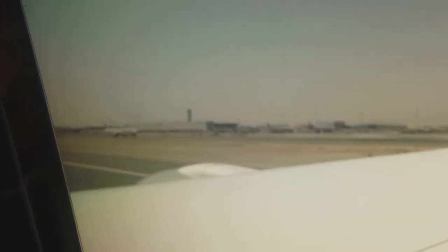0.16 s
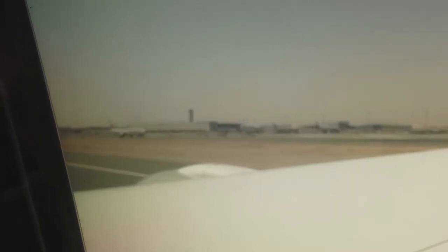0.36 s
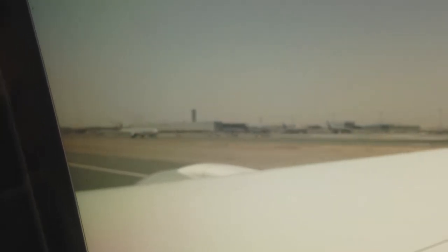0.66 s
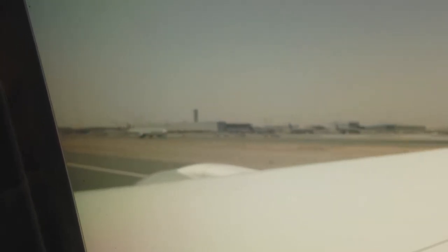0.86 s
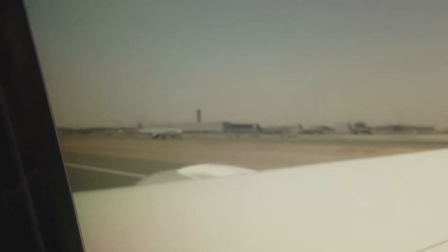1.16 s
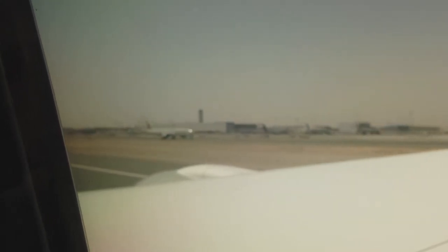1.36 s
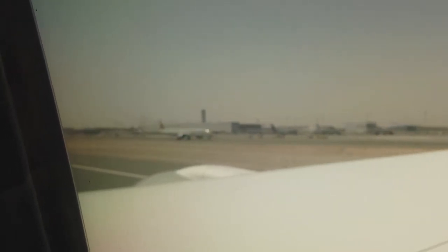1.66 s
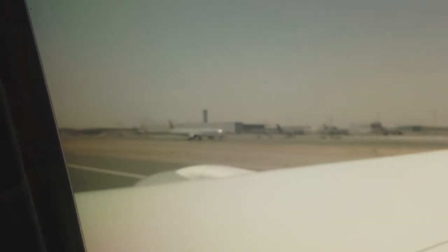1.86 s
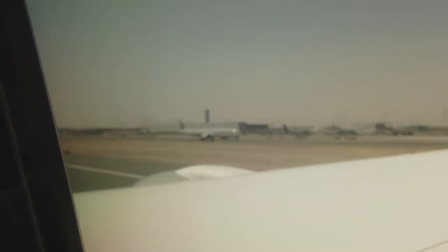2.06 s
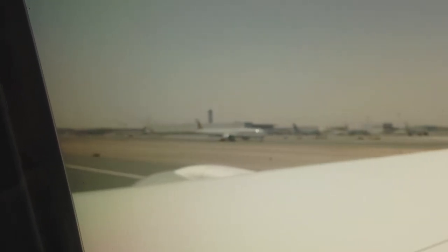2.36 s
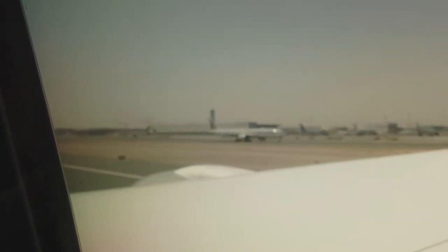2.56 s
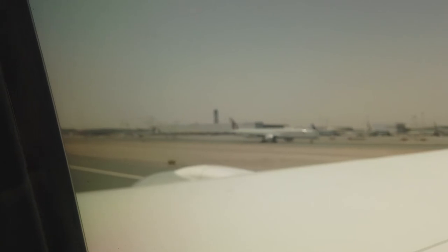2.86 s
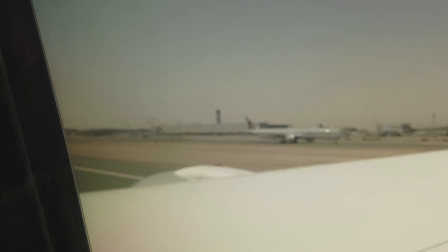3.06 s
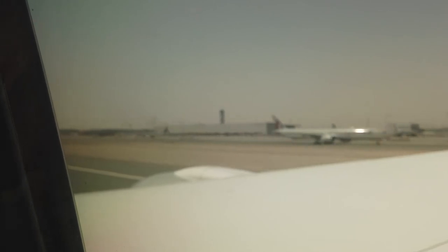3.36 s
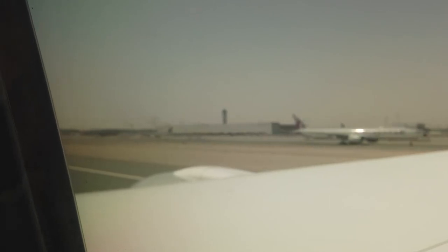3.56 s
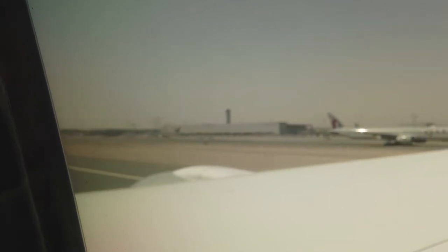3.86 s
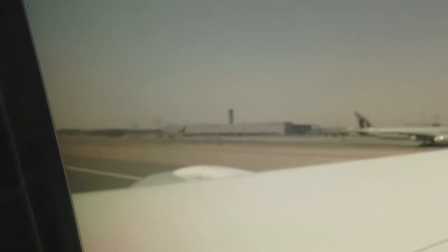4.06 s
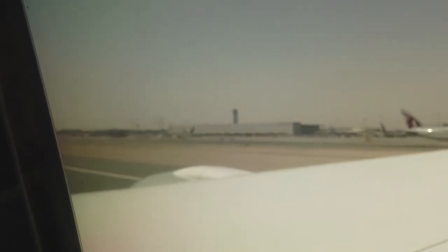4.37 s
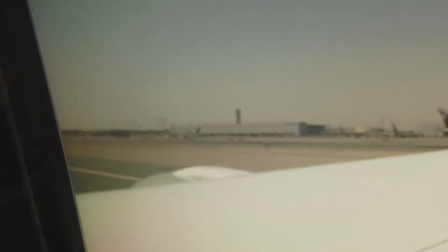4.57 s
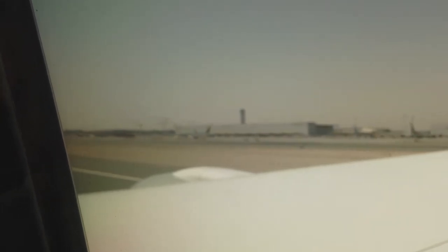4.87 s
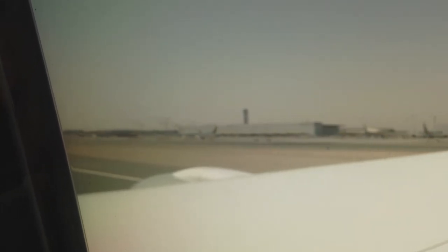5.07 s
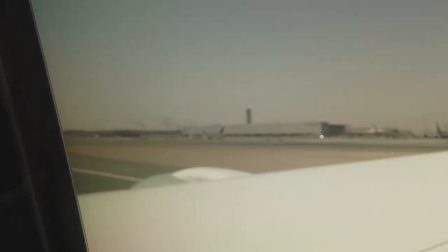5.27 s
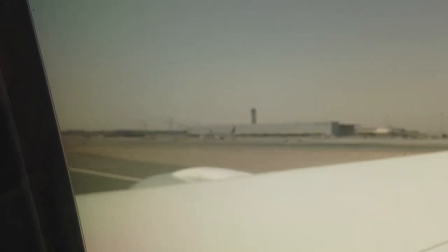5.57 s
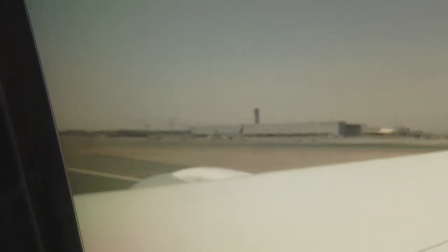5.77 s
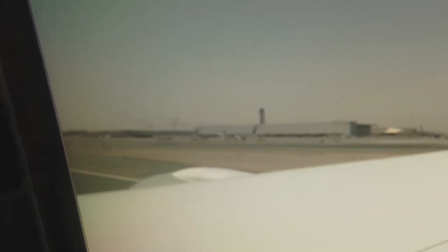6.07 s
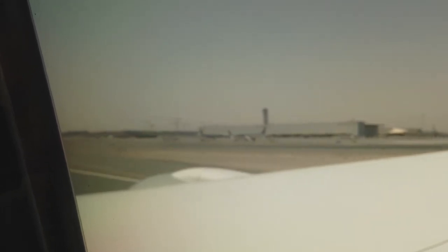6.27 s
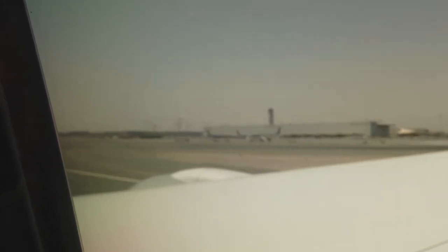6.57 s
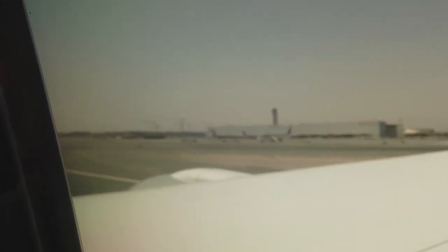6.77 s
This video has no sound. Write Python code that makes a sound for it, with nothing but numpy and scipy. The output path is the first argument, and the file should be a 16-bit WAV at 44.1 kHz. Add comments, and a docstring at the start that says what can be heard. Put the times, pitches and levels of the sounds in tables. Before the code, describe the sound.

Continuous interior of a passenger jet rolling on the ground: heavy low-frequency rumble and airframe roar dominate, with irregular muffled jolts. A quiet air rush and wavering fan tones sit behind. Small plastic rattles arrive in clusters near two, three and five seconds, with tiny metallic jingles and clicks. Close microphone at the seat, wide soft treble, short absorbent cabin tail.

```python
"""Airliner cabin while taxiing

Inside an airliner at a steady taxiing speed, heard from a window seat over the wing.
Pavement shakes the fuselage into a heavy rumble of band-limited noise and ringing jolts.
Drifting sines give the engine drone, the fans and beating whines; filtered noise gives air and hiss.
Impulses and short rings make the plastic trim chatter, with knocks, ticks, jingles and squeaks."""
import sys
import numpy as np
from scipy import signal
from scipy.fft import rfft, irfft, next_fast_len
from scipy.io import wavfile
from scipy.ndimage import uniform_filter1d

SR = 44100
rng = np.random.default_rng(int(sys.argv[2]) if len(sys.argv) > 2 else 0)


def wav_record(signal):
    """Record a signal, one row per channel, as 16-bit PCM in the file named by sys.argv[1]."""
    frames = np.transpose(np.atleast_2d(signal))
    bounded = np.clip(frames, -1, 1)
    # unit amplitude maps onto the largest positive 16-bit level
    quanta = np.round(bounded * 32767).astype(np.int16)
    wavfile.write(sys.argv[1], SR, quanta)


N = 304731
TIME = np.arange(N) / SR  # s

# Spectral shapes of the sources. Each row: frequency in Hz, relative response in dB.
AIR_SPECTRUM = [(200, 9.5), (600, 1), (800, 2.5), (1200, -0.5), (1500, -4), (1900, -5), (2600, -10),
                (3200, -24), (3900, -24.5), (5400, -29.5), (6500, -35.5), (9000, -39)]
HISS_SPECTRUM = [(7000, -35), (8900, -15), (9600, -2), (10400, 0), (11000, -4), (11800, -14), (14000, -28)]
PANEL_SPECTRUM = [(200, -17), (500, -8), (1000, 3), (1350, 2), (1550, 0), (1800, -1), (2200, -4),
                  (3000, -8), (4200, -24), (7000, -36)]
METAL_SPECTRUM = [(1500, -22.5), (3000, 5), (4200, -4.5), (5000, 3), (6000, -8.5), (6700, -1.5),
                  (8500, -15), (9700, 0.5), (10600, 3.5), (12000, -7), (15000, -8)]
TRIM_SPECTRUM = [(400, -20), (900, -5), (1250, -2), (1550, -4), (1850, 0), (2350, 1.5), (2600, 1.5),
                 (2750, 0), (2950, 2), (3250, -6.5), (3600, -14), (4100, -19.5), (4600, -20), (5030, -17.5),
                 (5400, -22), (5800, -21), (6300, -31), (6700, -28), (7300, -38), (13000, -43)]
ROAR_SPECTRUM = [(70, -12), (120, 4.5), (160, 5), (180, -1), (195, 1), (210, -2.5), (260, -6.5),
                 (312, -5.5), (330, -10.5), (355, -8), (398, -14.5), (420, -10), (478, -20), (520, -17.5),
                 (650, -27), (1000, -43), (2000, -72)]
HULL_SPECTRUM = [(12, -26.5), (22, -16), (34, -14), (43, -12), (53, 3), (60, -2.5), (69, 0), (78, -8),
                 (100, -27)]
FLOOR_SPECTRUM = [(55, -28.5), (72, -4.5), (82, 6.5), (105, 2), (130, -8.5), (170, -27), (260, -60)]
# The airframe's steady, deepest rumble. Each row: frequency in Hz, relative response in dB.
DEEP_SPECTRUM = [(14, -17), (24, -4.5), (34, 0), (44, -5.5), (60, -19.5)]
# Stereo width of diffuse cabin sound. Each row: frequency in Hz, side minus mid level in dB.
WIDTH = [(60, -48), (110, -40), (160, -41), (320, -29), (740, -20), (1200, -17), (1700, -13), (2100, -7),
         (2700, 1), (4000, 1), (7000, 0), (8200, 3), (10500, -3), (12000, 1), (14000, 0)]

# Ventilation fan tone through time. Each row: time in seconds, mean level in dB rms.
FAN_LEVEL = [(0, -57), (0.55, -55), (1.2, -59.5), (3.05, -56.5), (3.6, -52), (4.15, -50), (4.45, -62),
             (4.68, -56), (5, -50.5), (6.05, -52.5), (6.5, -59.5), (6.91, -55.5)]
# Hum of the stronger pump through time. Each row: time in seconds, peak level in dB.
PUMP_LEVEL = [(0, -56.5), (2.1, -55.5), (3, -57), (4.4, -58.5), (5.1, -56), (6.05, -58.5), (6.4, -52),
              (6.91, -58.5)]
# Stronger electrical whine through time. Each row: time in seconds, level in dB rms.
ELECTRIC_LEVEL = [(0, -64), (0.9, -72.5), (2.6, -68.5), (3.3, -78), (3.95, -71), (6.1, -78.5), (6.91, -79)]
# Steady machine tones. Each row: mean frequency in Hz, mean level in dB rms, rms wander in Hz,
# phase between the ears in radians.
MACHINE_TONES = [(68.5, -31, 1.2, 0), (1368, -69, 1, .2), (1709, -68.5, 1, .3), (3663, -87, 6, 1),
                 (9376, -94, 3, 1.8), (9589, -90, 3, 1.5), (12328, -79, 3, 1), (13670, -87, 3, 2.4)]

# Wall panel knocks. Each row: start in seconds, level in dB before the knock gain and panel filter.
KNOCKS = [(0.49, -31), (2.427, -31), (4.842, -34), (5.825, -36)]
# Wall panel shudders. Each row: start in seconds, level in dB before gain and filter, decay in seconds.
SHUDDERS = [(0.493, -52, 0.023), (0.927, -52, 0.058), (2.435, -52.5, 0.11), (2.924, -51, 0.056),
            (4.891, -50, 0.035), (5.379, -51, 0.052), (5.825, -48.5, 0.013), (6.786, -50, 0.074)]
# Clicks of tiny metal parts. Each row: start in seconds, envelope peak in dB before filtering.
CLICKS = [(0.585, -60), (1.089, -62), (4.61, -62), (4.889, -58), (5.366, -52), (5.424, -54), (5.482, -57),
          (5.696, -52), (5.753, -59.5), (5.806, -59.5), (5.925, -57.5), (6.035, -55.5), (6.673, -57)]
# Jingles of small metal fittings. Each row: start in seconds, level in dB before rise, gain and filter,
# decay in seconds.
JINGLES = [(1.932, -55.5, 0.025), (1.968, -62, 0.028), (2.432, -51, 0.011), (2.442, -46, 0.0095),
           (2.498, -56, 0.025), (2.055, -62.5, 0.018), (2.957, -62, 0.016), (4.665, -58, .02),
           (5.367, -84, 0.033), (5.809, -58.5, 0.019), (6.781, -50.5, 0.0084), (6.807, -58, .02)]
# Squeaks of a fitting. Each row: peak time in seconds, mean pitch in Hz, peak level of each partial in dB.
SQUEAKS = [(0.395, 5770, -62.5), (1.16, 5700, -64.5), (2.22, 5730, -63), (3.325, 5770, -65),
           (6.69, 5800, -68)]
# Ticks of small catches. Each row: start in seconds, envelope peak in dB, mean ring frequency in Hz.
TICKS = [(1.566, -60, 5030), (1.675, -50.5, 4160), (1.68, -61, 4650), (1.974, -53, 5030),
         (2.047, -62, 6350), (3.687, -66, 5500), (3.718, -56, 5270), (3.774, -65, 5370),
         (4.041, -55.5, 5140), (4.064, -56, 5040), (4.19, -59, 4800), (5.085, -56, 4960),
         (5.255, -56, 5000)]
# Rubs of loose trim. Each row: start in seconds, level in dB before rise, gain and filter, decay in seconds.
RUBS = [(0.91, -54.5, .06), (1.935, -51.5, 0.087), (2.055, -62, 0.086), (2.285, -60.5, .05),
        (2.425, -56, 0.12), (2.88, -58, 0.085), (2.96, -61.5, .08), (3.21, -63, .04), (3.03, -61, .03),
        (3.65, -57, .12), (4.67, -59.5, 0.059), (4.875, -63.5, 0.072), (4.955, -62, 0.026),
        (5.38, -61.5, 0.093), (6.795, -57, 0.033)]
# Taps of loose trim. Each row: start in seconds, level in dB before the tap or piece gain.
CHATTER = [(0.113, -45), (0.492, -45), (0.841, -45), (0.916, -43), (0.951, -43), (0.96, -44), (1.39, -47),
           (1.858, -43), (1.891, -42), (1.943, -37), (1.957, -43), (1.969, -37), (2.0, -42), (2.058, -39),
           (2.076, -43), (2.153, -46), (2.281, -44), (2.31, -42), (2.403, -42), (2.418, -45), (2.434, -37),
           (2.448, -42), (2.468, -41), (2.497, -44), (2.511, -41), (2.552, -45), (2.59, -45), (2.882, -45),
           (2.896, -46), (2.926, -39), (2.974, -39), (2.991, -41), (3.033, -43), (3.05, -38), (3.216, -41),
           (3.233, -41), (3.336, -46), (3.458, -44), (3.476, -45), (3.593, -45), (3.65, -46), (3.774, -38),
           (3.832, -45), (4.03, -44), (4.683, -39), (4.886, -41), (4.962, -43), (4.979, -43), (5.05, -39),
           (5.192, -45), (5.252, -37), (5.367, -42), (5.385, -36), (5.401, -42), (5.445, -41), (5.827, -35),
           (5.845, -43), (5.958, -45), (6.071, -42), (6.339, -47), (6.566, -42), (6.595, -46), (6.695, -44),
           (6.801, -37), (6.813, -43), (6.821, -43)]

# Jolts from pavement joints. Each row: start in seconds, envelope peak in dB, airframe ring in Hz.
JOINTS = [(0.278, -14.5, 83), (0.563, -13, 67.5), (1.031, -14, 30.2), (1.066, -13.5, 90.4),
          (1.278, -14, 92.4), (1.343, -15.5, 66.3), (1.467, -16.5, 78), (1.868, -17, 30), (1.895, -14, 61),
          (2.381, -13, 75.2), (2.472, -7.5, 68.6), (2.49, -19, 33), (2.689, -10, 74), (2.76, -9.5, 76.3),
          (2.857, -8.5, 68), (3.008, -6.5, 68), (3.208, -12.5, 78), (3.628, -10.5, 70.3),
          (3.801, -11, 56.5), (4.659, -9.5, 69), (4.69, -18, 31.7), (4.78, -15.5, 90.7), (5.054, -10.5, 75),
          (5.212, -9, 70), (5.331, -7, 64.8), (5.676, -23.5, 73.3), (5.796, -8, 63.4), (5.903, -14.5, 72.7),
          (6.017, -12, 68), (6.076, -33, 307), (6.177, -24.5, 237), (6.294, -18, 79.2), (6.371, -14.5, 82),
          (6.415, -32.5, 376), (6.54, -20, 83), (6.77, -11.5, 69.4)]
# Rough pavement under the wheels. Each row: start in seconds, length in seconds,
# deep hull rumble in dB, floor drumming in dB.
PATCHES = [(0.0, 0.27, -29.5, -26.5), (0.525, .13, -22.5, -29), (0.833, 0.08, -21.5, -33.5),
           (1.06, 0.12, -21.5, -19), (1.323, 0.29, -25, -21), (1.793, 0.33, -20.5, -25.5),
           (2.364, 0.22, -16, -22.5), (2.684, 0.1, -19, -24.5), (2.852, 0.28, -17, -24.5),
           (3.399, .1, -20.5, -27.5), (3.615, 0.13, -18, -27.5), (4.412, .1, -19.5, -28),
           (4.643, 0.16, -18.5, -23.5), (4.886, 0.12, -21.5, -39), (5.015, 0.15, -20, -25.5),
           (5.219, 0.22, -18, -33), (5.637, 0.41, -20.5, -21.5), (6.13, 0.23, -22, -25.5),
           (6.532, 0.053, -17, -15), (6.762, 0.053, -21.5, -23)]

FAN_HZ, PUMP_HZ, ELECTRIC_HZ = 633, 853.8, 10957
PUMP_BEAT_HZ, PUMP_CREST_S = 1.6, 0.115
PUMP_SLIP_RAD = 0.36  # the second pump runs a little unevenly
PUMP_APART_RAD = 0.3  # phase between the ears
TONE_WAVER_DB = 1.5  # the machine tones swell and sink

RUSH_DB, RUSH_FOLLOW = -48, 0.08  # rush of air and tyres; dB per dB of shaking
BUZZ_DB, BUZZ_FOLLOW = -64, 0.27  # fine buzz of the trim; dB per dB of shaking
ROAR_DB, ROAR_FOLLOW = -33.5, 0.35  # airframe roar; dB per dB of floor drumming
DEEP_DB = -32.5

KNOCK_DB, KNOCK_RING_S = 10.5, 0.005
JINGLE_RISE_S = 0.012
SQUEAK_WAVER, SQUEAK_RISE_S, SQUEAK_FADE_S = 0.008, 0.007, 0.015  # waver: rms share of the pitch
TICK_DECAY_S, TICK_WAVER = 0.0037, 0.089  # waver: rms share of the ring pitch
TAP_DB, TAP_RING_S = 9, 0.003
RUB_DB, RUB_RISE_S = 1.5, 0.014
STRAY_DB, STRAY_RANGE_DB = -51, 5  # strongest stray tap at mean shaking; spread below it
BOUNCE_MIN_S, BOUNCE_SPREAD_S, BOUNCE_DROP_DB, BOUNCE_FADE_DB = 0.002, 0.011, 11, 3
PIECE_LOW_HZ, PIECE_HIGH_HZ = 2000, 3000
PIECE_DB, PIECE_RISE_S, PIECE_RING_S = -1, 0.0003, 0.0016
RING_SIDE_DB, CONTACT_SPREAD = -5, 0.6  # stereo width of a contact's ring and of its spike
CABIN_DB, CABIN_T60_S = -3.5, 0.085

SMOOTH_HULL_DB, SMOOTH_FLOOR_DB = -29.5, -28.5  # on smooth pavement
PATCH_ATTACK_S, PATCH_RELEASE_S = 0.01, 0.075  # the fuselage picks up the shaking and rings down
HULL_HZ, JOLT_RISE_S = 70, 0.015  # a jolt at the hull's pitch rises this fast, a deeper one slower
JOLT_TAKEOVER = 2.3  # how far the rumble gives way to a jolt
TOP_HZ = 15600

EARS = np.array([[1], [-1]])  # opposite signs for left and right


def undb(db):
    """Decibel definition: amplitude gain is 10 to the power dB / 20."""
    return 10 ** (np.asarray(db) / 20)


def unit(x):
    """Power normalization: scale to rms 1."""
    return x / np.sqrt(np.mean(x ** 2))


def line(table):
    """Linear interpolation: a level through time from rows of (s, dB)."""
    s, db = np.transpose(table)
    return np.interp(TIME, s, db)


def walk(rate):
    """Smoothed random process: held noise at the given rate, averaged twice, with rms 1."""
    hold = max(int(SR / rate), 1)
    steps = np.repeat(rng.standard_normal(N // hold + 1), hold)
    smooth = uniform_filter1d(uniform_filter1d(steps, hold), hold)
    return unit(smooth[:N])


def colour(x, points):
    """Minimum-phase filtering: a causal response through (Hz, dB) points, with unit power gain."""
    size = next_fast_len(N + SR // 2, real=True)
    hz, db = np.transpose(points)
    f = np.maximum(np.fft.rfftfreq(size, 1 / SR), 1)
    below = np.maximum(np.log(hz[0] / f), 0)
    above = np.maximum(np.log(f / hz[-1]), 0)
    log_gain = np.log(undb(np.interp(np.log(f), np.log(hz), db))) - below - 2 * above
    # folding the cepstrum onto positive time makes the filter causal
    cepstrum = irfft(log_gain, size)
    cepstrum[1:size // 2] *= 2
    cepstrum[size // 2 + 1:] = 0
    response = np.exp(rfft(cepstrum))
    response = response / np.sqrt(np.mean(abs(response) ** 2))
    return irfft(rfft(x, size) * response, size)[..., :N]


def diffuse(size):
    """Diffuse-field coherence: noise alike in both ears in the bass and nearly unrelated in the treble."""
    mid, side = rng.standard_normal((2, size))
    hz, db = np.transpose(WIDTH)
    padded = next_fast_len(size, real=True)
    f = np.maximum(np.fft.rfftfreq(padded, 1 / SR), 1)
    width = undb(np.interp(np.log(f), np.log(hz), db))
    side = irfft(rfft(side, padded) * width, padded)[:size]
    return mid + side * EARS


def nearby(side_db):
    """Near-field coherence: a shared noise plus a side noise at the given relative level."""
    mid = rng.standard_normal(N)
    side = undb(side_db) * rng.standard_normal(N)
    return mid + side * EARS


def tone(hz, wander_hz, apart):
    """Frequency modulation: a drifting sine of rms 1; standing waves shift its phase between the ears."""
    phase = 2 * np.pi * np.cumsum(hz + wander_hz * walk(3)) / SR
    return np.sqrt(2) * np.sin(phase + apart / 2 * EARS)


def blows(rows, rise_s=0):
    """Incoherent addition: the powers of decaying (s, dB, decay s) blows add; averaging softens the start."""
    power = np.zeros(N)
    for s, db, decay in rows:
        start = int(np.clip(s, 0, TIME[-1]) * SR)
        age = TIME[:min(SR // 2, N - start)]
        power[start:start + len(age)] += (undb(db) * np.exp(-age / decay)) ** 2
    return uniform_filter1d(np.sqrt(power), max(int(rise_s * SR), 1))


def contacts(rows, ring_s):
    """Impact excitation: (s, dB) spikes from random sides, each followed by a brief ring of fresh noise."""
    s, db = np.transpose(rows)
    at = np.clip(s * SR, 0, N - 1).astype(int)
    spikes = np.zeros(N)
    np.maximum.at(spikes, at, undb(db))
    keep = np.exp(-2 / (ring_s * SR))  # power decays twice as fast as amplitude
    ring_power = signal.lfilter([1 - keep], [1, -keep], spikes ** 2 + 1e-18)
    pan = CONTACT_SPREAD * rng.uniform(-1, 1, N) * EARS
    return spikes * (1 + pan) + nearby(RING_SIDE_DB) * np.sqrt(ring_power)


def crackle(count):
    """Shot noise: many tiny contacts at random times and of uneven strength, with rms 1."""
    rows = [(u * TIME[-1], 12 * v ** 2) for u, v in rng.random((count, 2))]
    return unit(contacts(rows, TAP_RING_S))


def air(shake_db):
    """Turbulence noise: a rush of ventilation, engine and tyre wash, and a thin, fading nozzle hiss."""
    sway_db = 0.4 * walk(6)
    rush = colour(diffuse(N), AIR_SPECTRUM) * undb(RUSH_DB + RUSH_FOLLOW * shake_db + sway_db)
    hiss_db = np.interp(TIME, [0, TIME[-1]], [-74, -81]) + 1.8 * walk(25)
    return rush + colour(diffuse(N), HISS_SPECTRUM) * undb(hiss_db)


def machines():
    """Beating: two pumps of nearly one speed beat slowly, two electrical whines fast, among steady tones."""
    fan = tone(FAN_HZ, 0.9, 0.1) * undb(line(FAN_LEVEL) + 1.2 * walk(12))

    beat_phase = 2 * np.pi * PUMP_BEAT_HZ * (TIME - PUMP_CREST_S) + PUMP_SLIP_RAD * walk(4)
    beat = 1 + undb(-3) * np.exp(1j * beat_phase)  # the second pump is 3 dB weaker
    pump_phase = 2 * np.pi * PUMP_HZ * TIME + PUMP_APART_RAD / 2 * EARS
    pumps = undb(line(PUMP_LEVEL)) * np.real(beat * np.exp(1j * pump_phase))

    second_whine = undb(-3 + 2 * walk(10)) * tone(ELECTRIC_HZ - 20, 2, 1.2)
    electric = (tone(ELECTRIC_HZ, 1.2, 1.5) + second_whine) * undb(line(ELECTRIC_LEVEL))

    steady = np.zeros((2, N))
    for hz, db, wander, apart in MACHINE_TONES:
        steady += undb(db + TONE_WAVER_DB * walk(4.4)) * tone(hz, wander, apart)
    return fan + pumps + electric + steady


def squeaks():
    """Frictional oscillation: brief rubs sing an unsteady high note and its octave."""
    out = np.zeros(N)
    waver = 1 + SQUEAK_WAVER * walk(300)
    for s, hz, db in SQUEAKS:
        phase = 2 * np.pi * np.cumsum(hz * waver) / SR
        swell = np.exp(-np.maximum((s - TIME) / SQUEAK_RISE_S, (TIME - s) / SQUEAK_FADE_S))
        out += undb(db) * swell * (np.sin(phase) + np.sin(2 * phase))
    return out


def ticks():
    """Damped resonance: each catch rings briefly and roughly at its own pitch."""
    turns = np.cumsum(1 + TICK_WAVER * walk(1500)) / SR
    out = np.zeros(N)
    for s, db, hz in TICKS:
        out += blows([(s, db, TICK_DECAY_S)]) * np.sin(2 * np.pi * hz * turns)
    return out


def fittings():
    """Forced resonance: dull panel knocks and shudders, needle-fine clicks and bright, grainy jingles."""
    grain = unit(undb(2.5 * walk(700)))
    shudders = nearby(-21.5) * undb(3.5) * grain * blows(SHUDDERS)
    knocks = undb(KNOCK_DB) * contacts(KNOCKS, KNOCK_RING_S)
    panel = colour(knocks + shudders, PANEL_SPECTRUM)
    click_rows = [(s, db, 0.0015) for s, db in CLICKS]
    clicks = colour(nearby(-4) * blows(click_rows), HISS_SPECTRUM)
    jingles = nearby(0.5) * undb(-3) * grain * blows(JINGLES, JINGLE_RISE_S)
    return panel + clicks + colour(jingles, METAL_SPECTRUM)


def tap(s, db, chance):
    """Inelastic rebound: a plastic edge strikes, then bounces more weakly; rows of (s, dB)."""
    delays = np.cumsum(BOUNCE_MIN_S + BOUNCE_SPREAD_S * chance)
    bounces = [(s + delay, db - BOUNCE_DROP_DB - BOUNCE_FADE_DB * k) for k, delay in enumerate(delays)]
    return [(s, db)] + bounces


def pieces(taps):
    """Modal ringing: each loose piece has its own short note, heard at the strike and every bounce."""
    out = np.zeros((2, N + SR))
    age = TIME[:SR // 50]
    shape = (1 - np.exp(-age / PIECE_RISE_S)) * np.exp(-age / PIECE_RING_S)
    for rows, (pitch, place) in zip(taps, rng.random((len(taps), 2))):
        hz = PIECE_LOW_HZ + (PIECE_HIGH_HZ - PIECE_LOW_HZ) * pitch
        note = shape * np.sin(2 * np.pi * hz * age + (2 * place - 1) * EARS)
        for s, db in rows:
            start = int(s * SR)
            out[:, start:start + len(age)] += undb(db + PIECE_DB) * note
    return out[:, :N]


def trim(shake_db):
    """Vibro-impact: plastic edges buzz and tap harder with the shaking, with set rubs and taps besides."""
    buzz = crackle(count=1300) * undb(BUZZ_DB + BUZZ_FOLLOW * shake_db)
    rubs = undb(RUB_DB) * crackle(count=2600) * blows(RUBS, RUB_RISE_S)
    taps = []
    for when, weak, *chance in rng.random((30, 5)):  # stray taps at random times
        db = STRAY_DB - STRAY_RANGE_DB * weak + BUZZ_FOLLOW * shake_db[int(when * N)]
        taps.append(tap(when * TIME[-1], db, np.array(chance)))
    for (s, db), chance in zip(CHATTER, rng.random((len(CHATTER), 3))):
        taps.append(tap(s, db, chance))
    strikes = undb(TAP_DB) * contacts(sum(taps, []), TAP_RING_S)
    return colour(buzz + rubs + strikes, TRIM_SPECTRUM) + pieces(taps)


def cabin(x):
    """Reverberation: seats and carpet absorb, leaving only a short diffuse tail."""
    age = TIME[:SR // 3]
    tail = diffuse(len(age)) * undb(-60 * age / CABIN_T60_S)
    tail /= np.sqrt(np.sum(tail ** 2, axis=1, keepdims=True))
    return x + undb(CABIN_DB) * signal.fftconvolve(x, tail, axes=1)[:, :N]


def shaking():
    """Transient vibration: hull and floor amplitudes build up, hold and ring down at each rough patch."""
    hull_power, floor_power = undb(SMOOTH_HULL_DB) ** 2, undb(SMOOTH_FLOOR_DB) ** 2
    for s, length, hull_db, floor_db in PATCHES:
        age = TIME - s
        attack = np.clip(age / PATCH_ATTACK_S + 0.5, 0, 1)
        swell = attack * np.exp(-np.maximum(age - length, 0) / PATCH_RELEASE_S)
        hull_power = hull_power + (undb(hull_db) * swell) ** 2
        floor_power = floor_power + (undb(floor_db) * swell) ** 2
    return np.sqrt(hull_power), np.sqrt(floor_power)


def boom(points):
    """Narrow-band resonance: the shaken fuselage's pitch wanders while its strength stays near 1."""
    x = colour(diffuse(N), points)
    return x / np.sqrt(uniform_filter1d(x[0] ** 2, size=SR // 14))


def wheels(hull, floor):
    """Structure-borne sound: pavement shakes hull and floor, the frame roars, and jolts briefly take over."""
    thumps, jolt_power = np.zeros(N), np.zeros(N)
    for s, db, hz in JOINTS:
        age = np.maximum(TIME - s, 0)
        rise = JOLT_RISE_S * np.sqrt(HULL_HZ / hz)
        swell = undb(db) * age / rise * np.exp(1 - age / rise)
        thumps += swell * np.sin(2 * np.pi * hz * age)
        jolt_power += swell ** 2
    give_way = 1 / np.sqrt(1 + JOLT_TAKEOVER * jolt_power / (hull ** 2 + floor ** 2))
    rumble = boom(HULL_SPECTRUM) * hull * give_way
    drumming = boom(FLOOR_SPECTRUM) * floor * np.sqrt(give_way)
    roar = colour(diffuse(N), ROAR_SPECTRUM) * undb(ROAR_DB) * (floor / np.mean(floor)) ** ROAR_FOLLOW
    deep = colour(diffuse(N), DEEP_SPECTRUM) * undb(DEEP_DB)
    return rumble + drumming + thumps + roar + deep


def scene():
    """Superposition: all sources add at the seat; shaking, in dB about its mean, drives rush, buzz and stray taps."""
    hull, floor = shaking()
    shake_db = 20 * np.log10(np.hypot(hull, floor))
    shake_db = shake_db - np.mean(shake_db)
    rattles = trim(shake_db) + fittings() + ticks() + squeaks()
    return air(shake_db) + machines() + cabin(rattles) + wheels(hull, floor)


def record(dry):
    """Band limiting: a steep elliptic low-pass cuts the top of the treble."""
    return signal.sosfilt(signal.ellip(8, 0.2, 70, TOP_HZ, fs=SR, output="sos"), dry)


dry = scene()
out = record(dry)
wav_record(out)
```